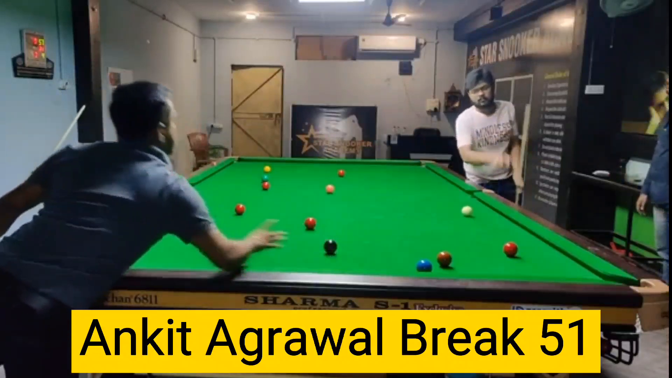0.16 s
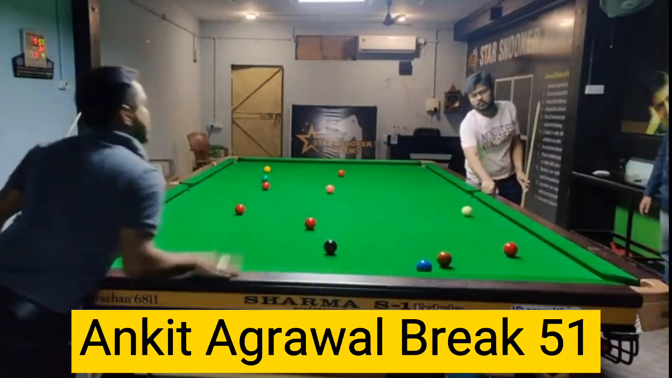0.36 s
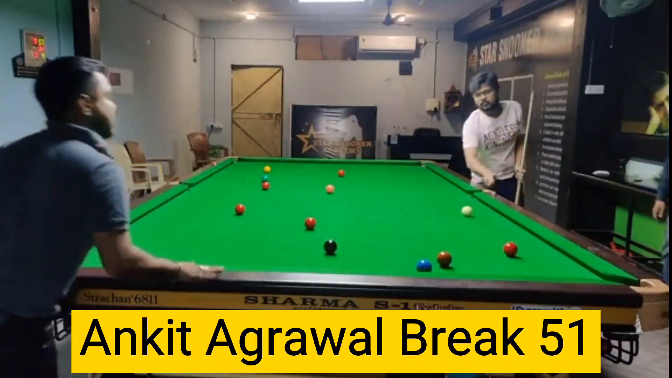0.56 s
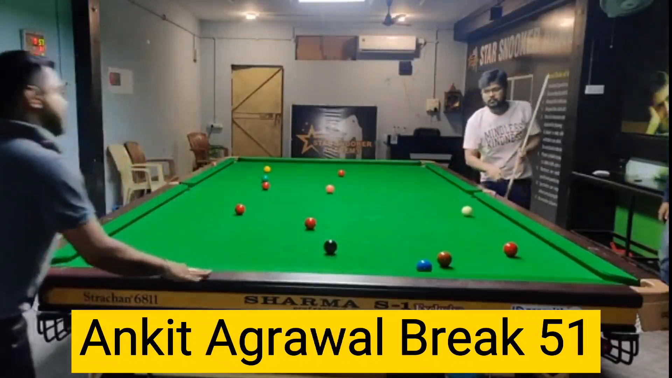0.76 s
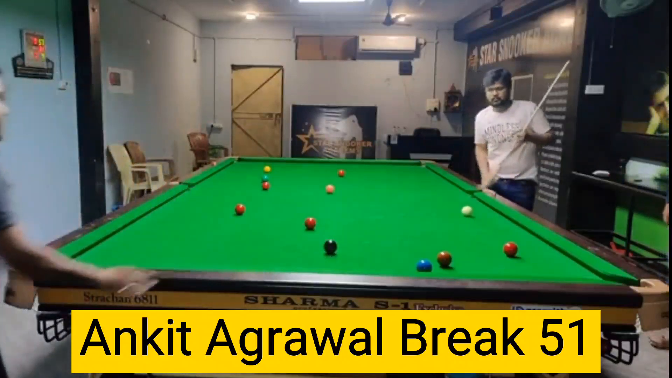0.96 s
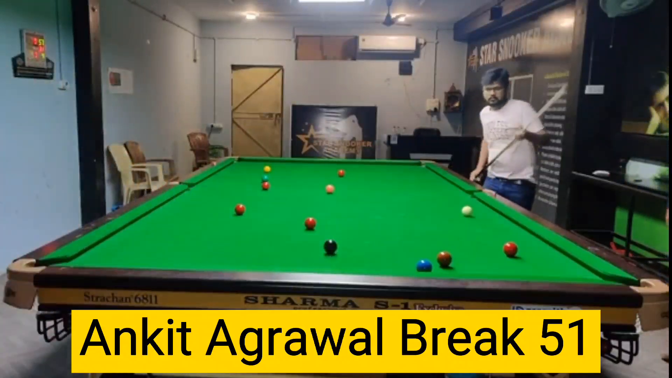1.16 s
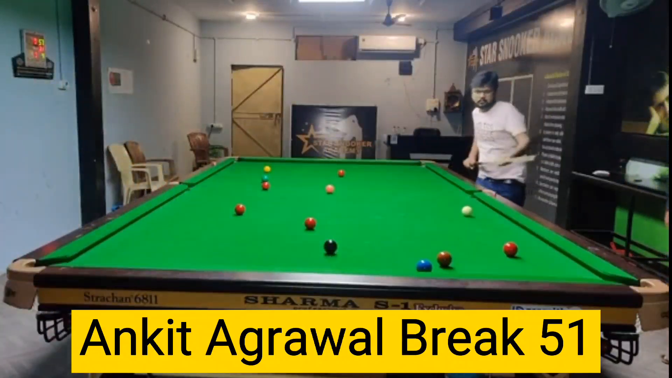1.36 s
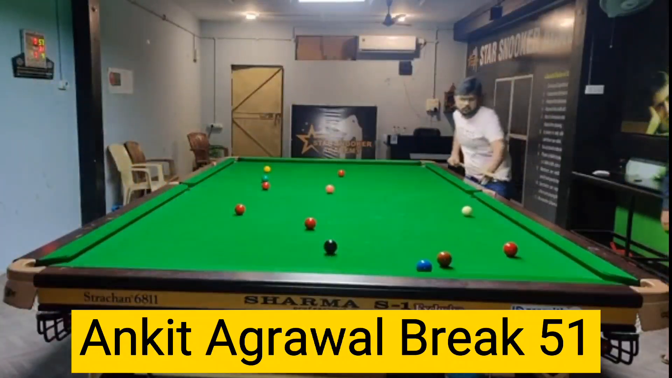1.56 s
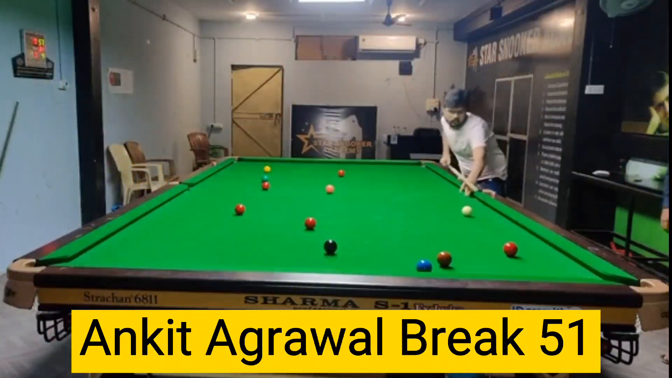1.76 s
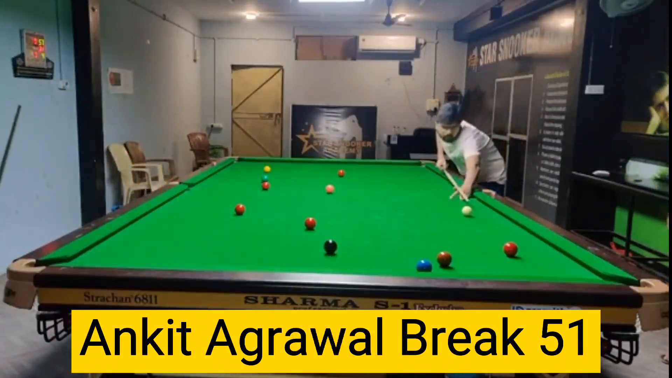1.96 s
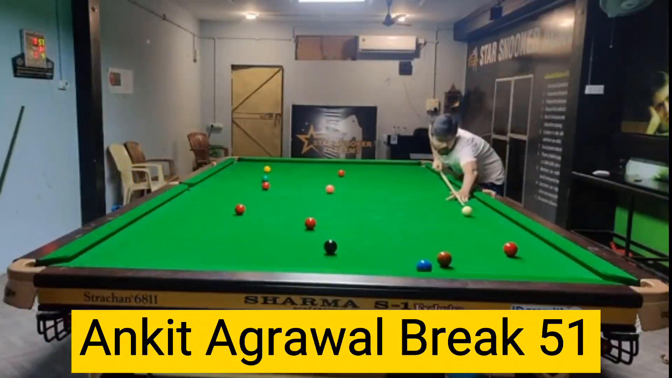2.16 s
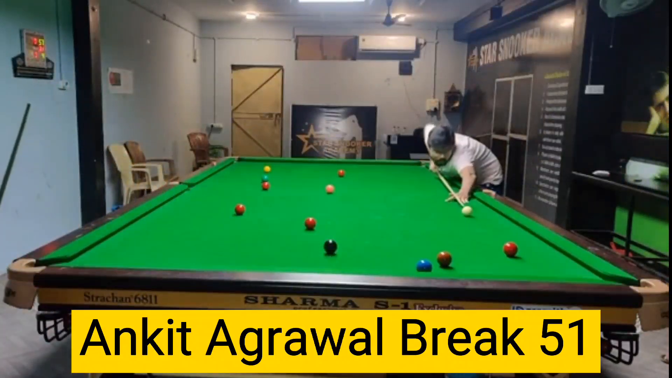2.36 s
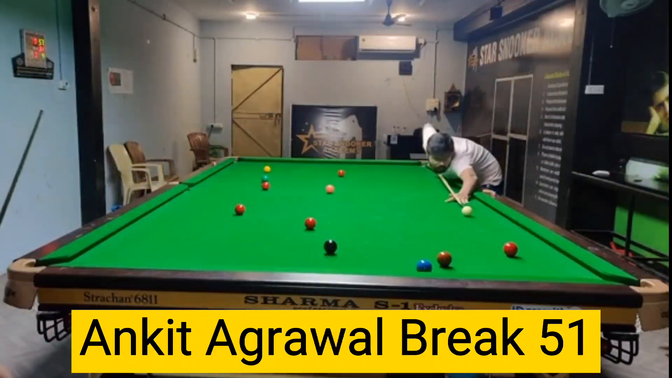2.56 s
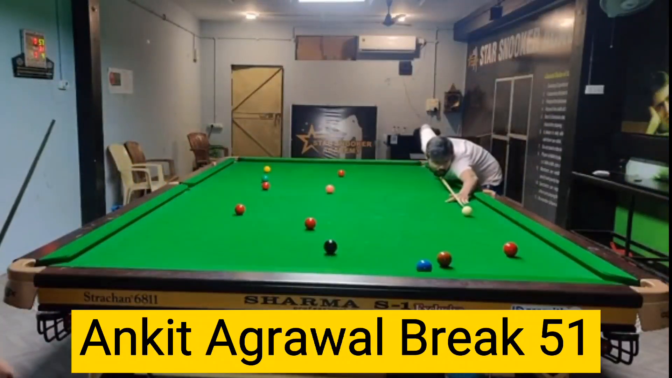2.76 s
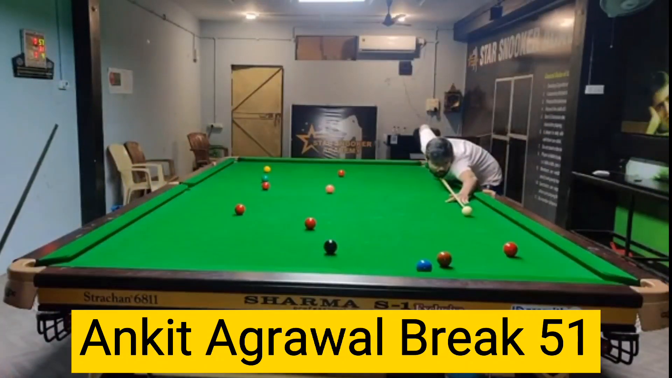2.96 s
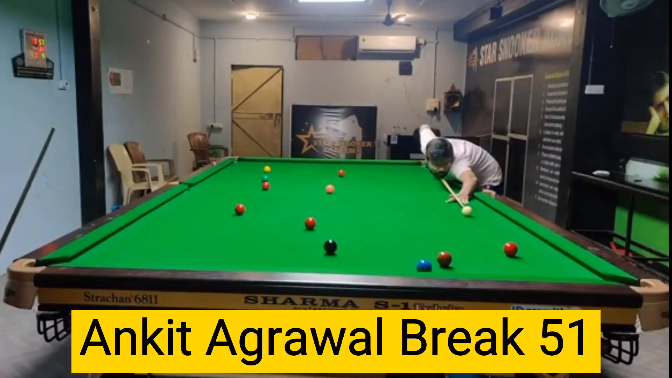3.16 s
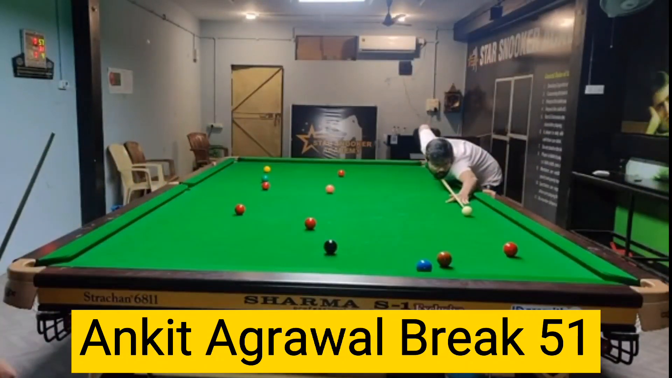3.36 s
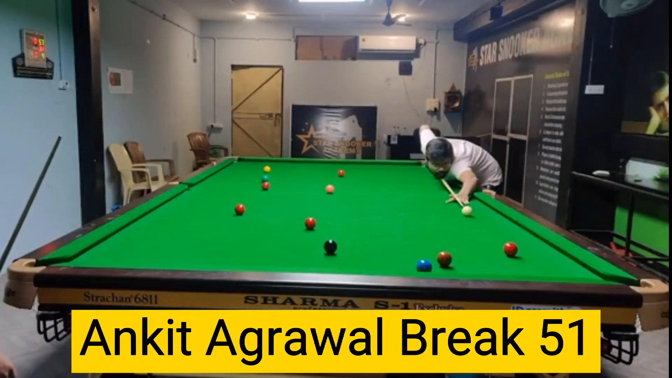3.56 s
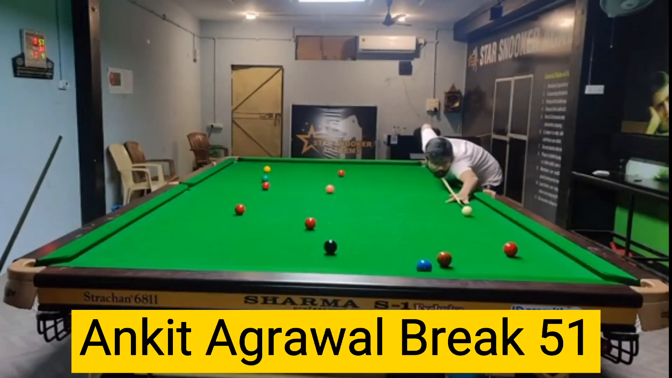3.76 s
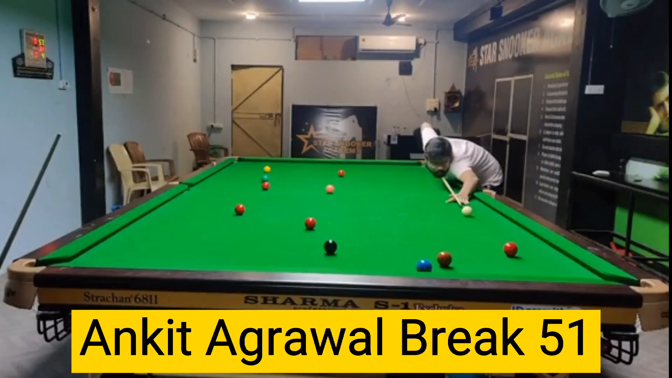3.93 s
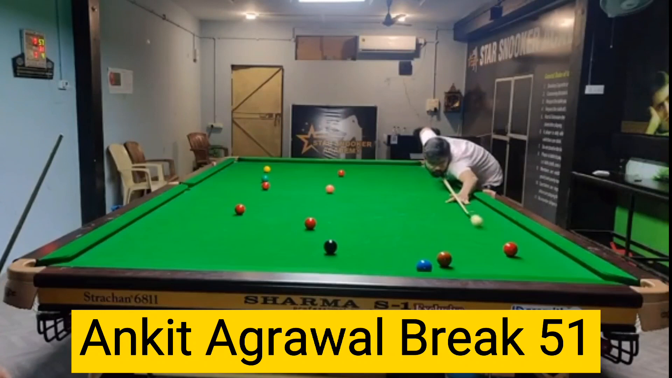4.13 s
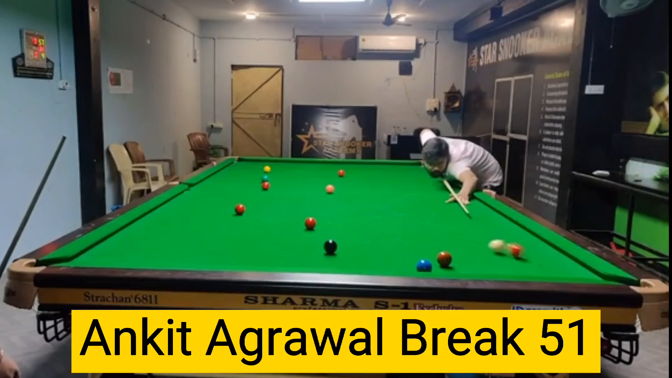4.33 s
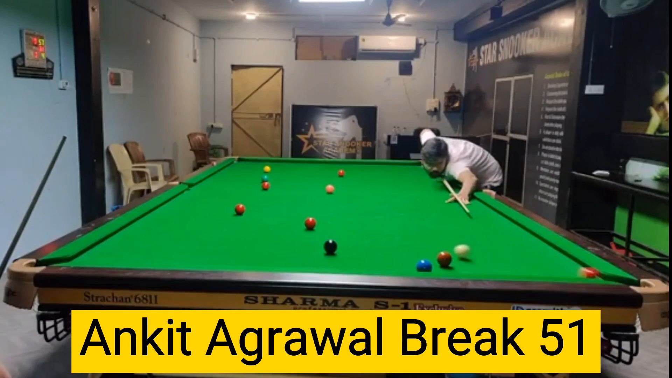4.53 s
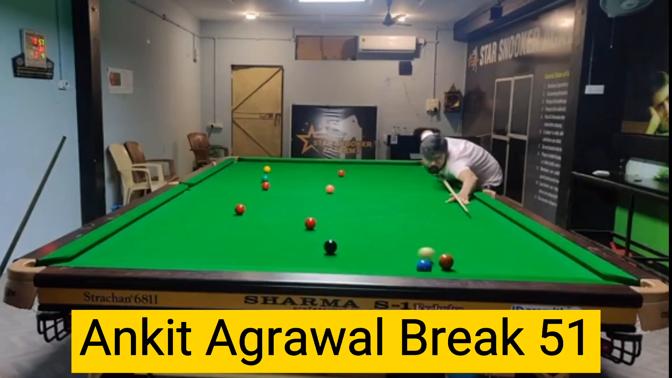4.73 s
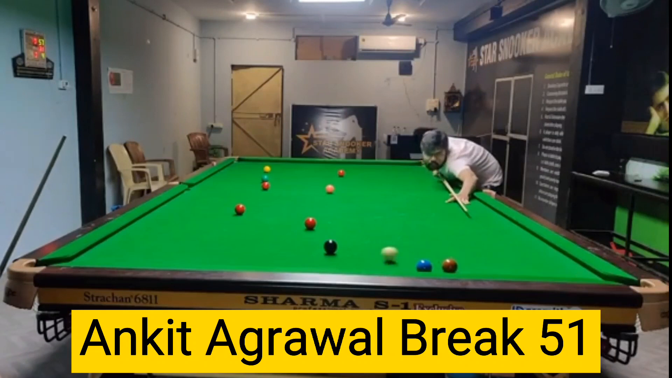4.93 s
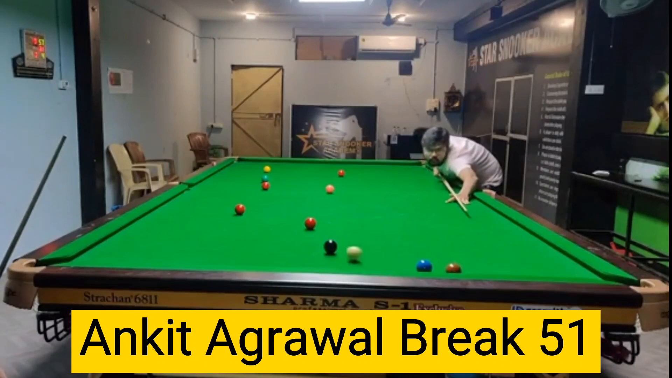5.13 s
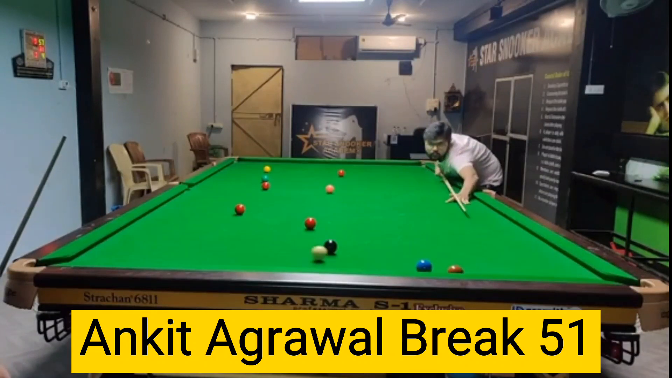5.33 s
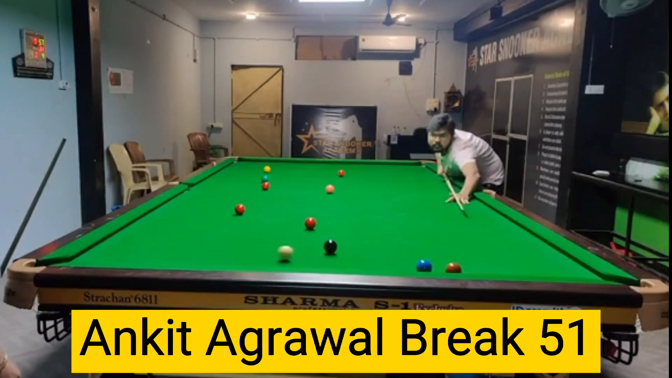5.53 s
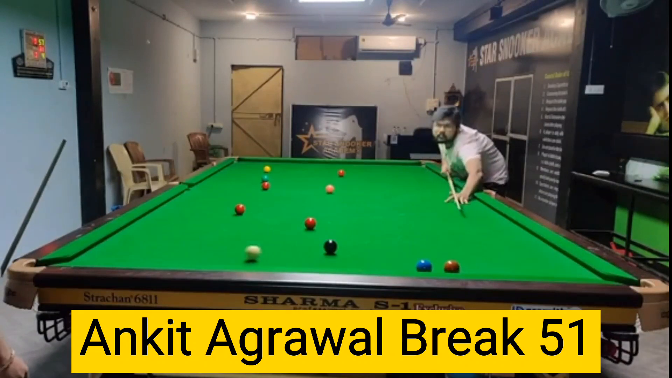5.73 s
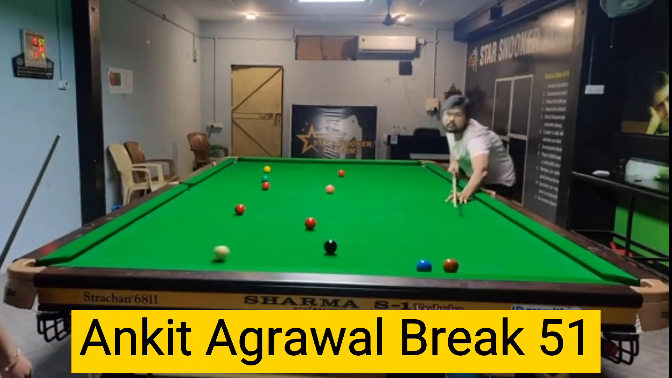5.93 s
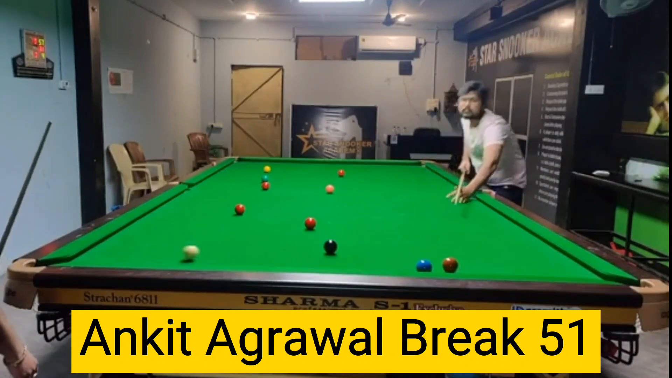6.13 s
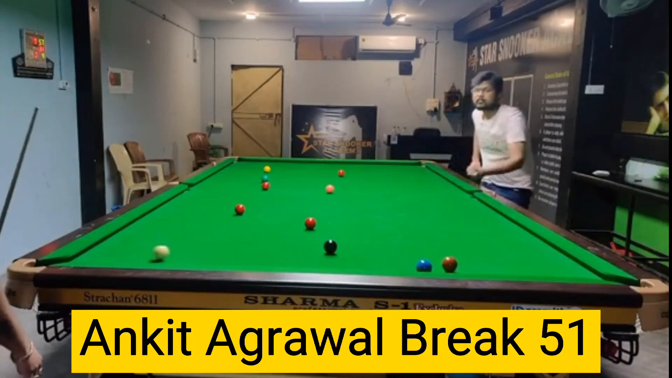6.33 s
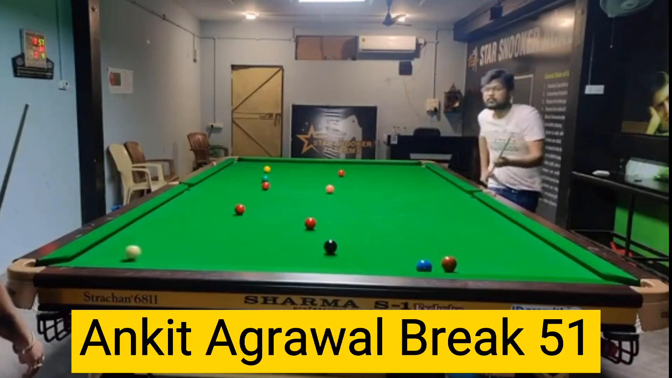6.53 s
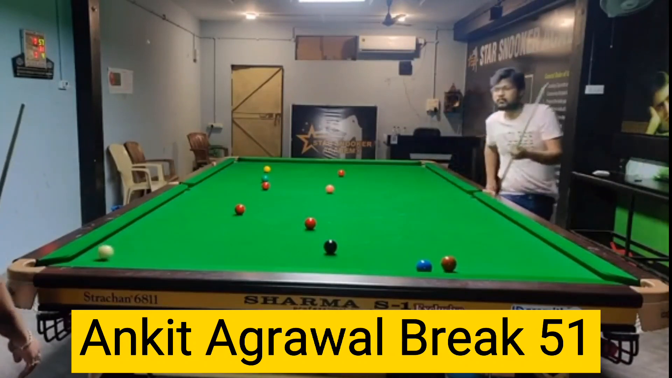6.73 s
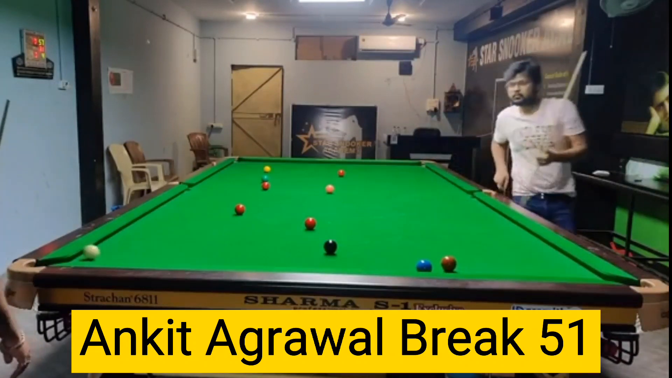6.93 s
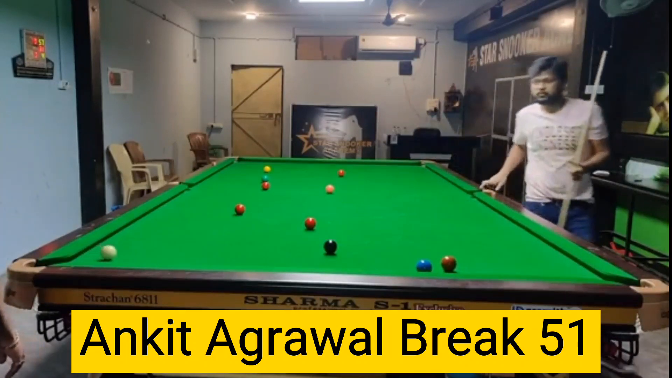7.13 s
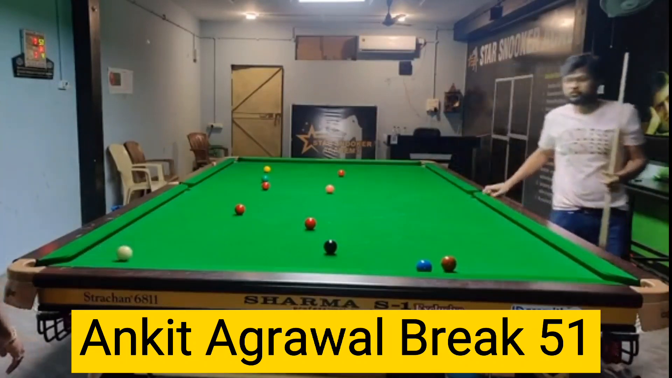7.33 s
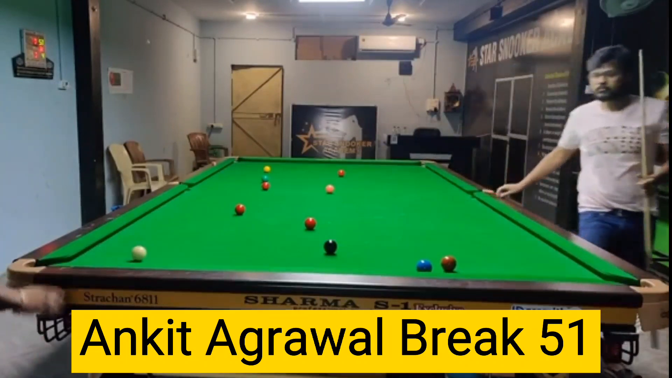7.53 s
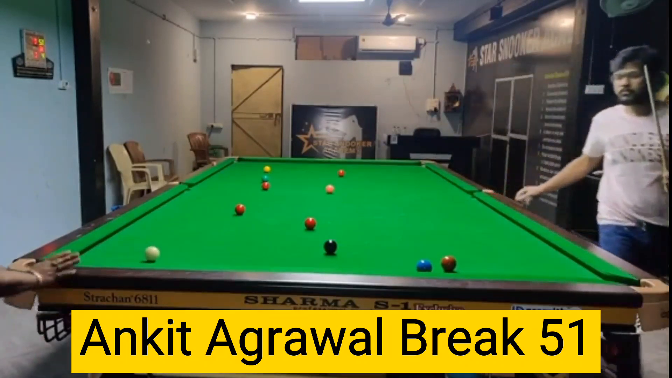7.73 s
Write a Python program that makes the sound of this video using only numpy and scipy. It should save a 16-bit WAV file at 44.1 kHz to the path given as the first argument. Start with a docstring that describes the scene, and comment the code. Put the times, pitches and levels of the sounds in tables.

```python
"""A snooker hall with bare walls: soft sounds lead into a clatter of wooden gear, bumps of the rail and taps.
Then a cue strikes, balls click, one thuds into a pocket, a cushion is touched, knocks and scuffs follow.
Each blow is a short sine pulse; noise in decaying bands rings after it for about a second or more.
A low noise rumble, likely rolling balls, follows the big blows; filtered noise makes the steady fans.
A dull microphone filters it all, and a hiss rises and falls with the sound."""
import sys
import numpy as np
from scipy import signal
from scipy.fft import rfft, irfft, next_fast_len
from scipy.io import wavfile
from scipy.ndimage import uniform_filter1d, map_coordinates

SR = 44100
rng = np.random.default_rng(int(sys.argv[2]) if len(sys.argv) > 2 else 0)


def field_ratio(decibels):
    """Amplitude ratio for a level in dB (20 dB per decade); scalars and array-likes work."""
    return 10 ** (np.asarray(decibels, dtype=float) / 20)


def int16_out(signal):
    """Quantize to a 16-bit WAV file."""
    q = np.round(np.clip(np.atleast_2d(signal).T, -1, 1) * 32767)
    wavfile.write(sys.argv[1], SR, q.astype(np.int16))


N = 343532


def shot():
    """Impact excitation: cue tip, ball on ball, the damped drop into the pocket and later knocks."""
    # blows: [t/s, contact level/dB, hall level/dB, contact f/Hz, blow length/s]
    cue_blows = [(4.2380, -3, -17, 740, .01)]
    ball_blows = [(4.515, -.5, -14, 2300, 0.005), (4.8455, -6.5, -29.5, 1900, 0.0019)]
    pocket_blows = [(5.013, -25.5, -30, 724, 0.0033), (5.031, -18.5, -33.5, 339, 0.023),
                    (5.064, -20, -44, 332, 0.0091), (5.108, -24.5, -40.5, 360, 0.025),
                    (5.193, -32, -48, 353, 0.013)]
    knock_blows = [(5.5885, -23.5, -30, 2900, 0.0025), (5.6065, -25, -35, 1900, 0.0026)]
    # relative spectra of the ringing: [f/Hz, density/dB per Hz]
    cue_tone = [(50, -68.5), (130, -17), (450, -9.5), (800, -7.5), (1200, -12.5), (2000, -20.5),
                (3000, -25), (4200, -34), (5700, -58), (9000, -110)]
    ball_tone = [(47, -43), (80, -24.5), (188, -16.5), (333, -21.5), (394, -14.5), (708, -11.5),
                 (1230, -3.5), (2140, 4), (3320, -7.5), (4410, -39.5), (5730, -64.5), (9700, -120)]
    pocket_tone = [(60, -47), (110, -15.5), (250, -5.5), (360, 0), (450, -8), (750, -11.5), (1000, -20.5),
                   (1400, -40), (2200, -84)]
    knock_tone = [(59, -18.5), (100, -6), (195, 0.5), (243, -9.5), (391, -3.5), (638, -10.5), (948, -10),
                  (1240, -3.5), (1340, -8.5), (1600, -5), (2920, -8), (4410, -41.5), (5730, -70),
                  (9700, -120)]
    # resonances of the cue shaft: [f/Hz, width/Hz, level/dB]
    cue_ring = [(1324, 40, -5), (1810, 95, -4), (2160, 116, 2), (2550, 130, -5.5), (3130, 390, -18.5),
                (3430, 250, -14.5), (3913, 90, -13.5)]
    # the cue's ring lasts longer near 300 and 1500 Hz, shorter near 800 Hz: [f/Hz, factor on t60]
    cue_stretch = [(300, 1.26), (800, 0.73), (1500, 1.43), (4000, 0.91)]
    # the pocket damps the thud: [f/Hz, factor on t60]
    net = [(200, 0.84), (400, 1), (800, 0.75)]
    cue = blows(cue_blows, ringing(cue_ring, cue_tone), cycles=.7, echo_db=2.5, stretch=cue_stretch)
    balls = blows(ball_blows, ball_tone, cycles=1.4, echo_db=4.5)
    pocket = blows(pocket_blows, pocket_tone, cycles=2.5, echo_db=0.0, stretch=net)
    knocks = blows(knock_blows, knock_tone, cycles=3.5, echo_db=1.0)
    return cue + balls + pocket + knocks


def woodwork():
    """Modal resonance of struck wood: gear clatters, bumps the rail and taps."""
    # blows: [t/s, contact level/dB, hall level/dB, contact f/Hz, blow length/s]
    clatter_blows = [(.5705, -10, -19, 1790, 0.0018)]
    rail_blows = [(.7195, -3.5, -18, 1110, 0.00096), (.853, -7.5, -29.5, 1180, 0.0044),
                  (.945, -14, -35, 1170, 0.02)]
    tap_blows = [(1.579, -20.5, -29.5, 550, 0.0073), (1.645, -20.5, -33.5, 870, 0.003),
                 (1.699, -22.5, -41, 895, 0.013)]
    # relative smooth spectra of the ringing: [f/Hz, density/dB per Hz]
    clatter_tone = [(50, -45), (100, -16), (200, -2), (1000, -12), (2200, -11.5), (3100, -19), (4400, -35),
                    (5700, -86), (9000, -110)]
    rail_tone = [(50, -58), (100, -22), (250, -4), (750, -7.5), (1100, -13), (2000, -10.5), (2850, -30.5),
                 (3200, -22.5), (4400, -48.5), (5700, -64), (9000, -110)]
    tap_tone = [(50, -32), (100, -7.5), (250, 1.5), (720, -1.5), (1100, -8.5), (2300, -15), (3600, -25),
                (4400, -39), (5700, -76), (9000, -110)]
    # resonances of the clattering stick, the rail and the tapped wood: [f/Hz, width/Hz, level/dB]
    clatter_ring = [(255, 195, -6.5), (613, 40, 3.5), (1298, 86, -0.5), (1800, 93, 0.5), (2000, 260, -2),
                    (2320, 25, -1.5), (3240, 180, -17)]
    rail_ring = [(251, 140, -1.5), (754, 160, -4.5), (1288, 51, -6.5), (1474, 87, -3), (1760, 56, -5.5)]
    tap_ring = [(1418, 49, 4), (1730, 82, -1.5), (2630, 140, -9), (3900, 100, -21.5)]
    clatter = blows(clatter_blows, ringing(clatter_ring, clatter_tone), cycles=1.8, echo_db=0.5)
    rail = blows(rail_blows, ringing(rail_ring, rail_tone), cycles=0.68, echo_db=-4.0)
    taps = blows(tap_blows, ringing(tap_ring, tap_tone), cycles=0.75, echo_db=1.0)
    return clatter + rail + taps


def soft_sounds():
    """Weak broadband excitation: the clatter's lead-in, a cushion touch and scuffs, likely shoes."""
    # soft sounds, mostly heard through the hall:
    # [t/s, contact level/dB, hall level/dB, contact f/Hz, length/s]
    soft_blows = [(.515, -65, -38.5, 2070, 0.087), (.563, -59, -30.5, 2000, .008),
                  (1.405, -37, -52.5, 2000, 0.009), (1.96, -57, -50.5, 1990, 0.032),
                  (5.305, -45, -44.5, 3520, 0.0014), (6.37, -61, -51, 2000, 0.036),
                  (6.565, -55, -50.5, 2200, 0.016), (6.79, -70, -43.5, 2500, 0.043),
                  (6.842, -48, -44, 1810, 0.014), (6.91, -49, -51.5, 2000, 0.043)]
    # relative spectrum of the ringing: [f/Hz, density/dB per Hz]
    soft_tone = [(150, -52.5), (300, -1.5), (720, -5.5), (1370, -6), (1730, -1.5), (2200, -8.5),
                 (2950, -10), (3500, -13), (4400, -28), (5700, -49), (9000, -110)]
    return blows(soft_blows, soft_tone, cycles=1.2, echo_db=4.5)


def blows(events, tone, cycles, echo_db, stretch=None):
    """Superposition of direct sound, a short contact pulse for each blow, and reverberant sound."""
    # the contact has little deep bass and a dull top: [f/Hz, gain/dB]
    contact_cut = [(50, -33.5), (250, -1), (500, 1), (3600, -0.5), (4600, -20), (6000, -30.5)]
    if stretch is None:
        # ordinary decay: [f/Hz, factor on t60]
        stretch = [(1000, 0.95)]
    direct, reverberant = np.zeros(N + SR), np.zeros(N + 2 * SR)
    t = np.arange(SR // 10) / SR
    for s, contact_db, hall_db, hz, blow_s in events:
        pulse_s = cycles / hz  # width of the bell between its 1/e points
        bell = np.exp(-(2 * t / pulse_s - 2) ** 2)
        pulse = np.sin(2 * np.pi * hz * t) * bell
        start = round(s * SR)
        direct[start:][:len(t)] += field_ratio(contact_db) * pulse
        reverberant[start:][:2 * SR] += field_ratio(hall_db) * hall(tone, blow_s, echo_db, stretch)
    return reverberant[:N] + shaped(direct[:N], contact_cut)


def hall(tone, blow_s, echo_db, stretch):
    """Reverberation: distinct early echoes melt into a diffuse tail, exponential in each band."""
    # decay of the hall before stretching: [f/Hz, t60/s]
    hall_t60 = [(100, 1.5), (300, 1.49), (1000, 1.554), (2000, 1.144), (4000, 1.025)]
    t = np.arange(2 * SR) / SR
    knots = rng.standard_normal(size=1200)
    roughness = map_coordinates(knots, [t * 420])  # 420 random points a second
    echoes = field_ratio(echo_db * np.exp(-t / 0.092) * roughness)
    noise = coloured(rng.standard_normal(len(t)), tone)
    even_echoes = echoes / np.sqrt(uniform_filter1d(echoes ** 2, size=2200))
    hz, frame_s, z = signal.stft(noise * even_echoes, SR, nperseg=256)
    t60 = along(hall_t60, hz) * along(stretch, hz)
    decay = field_ratio(-60 * frame_s / t60[:, None])
    tail = signal.istft(z * decay, SR, nperseg=256)[1][:len(t)]
    return tail * (1 - np.exp(-t / max(blow_s, .001)))  # the hall fills while the blow lasts


def swell_db():
    """Gain envelope: after loud blows the ring holds up or swells, then drops a step."""
    # [t/s, length/s, first level/dB, last level/dB]
    swells = [(0.846, 0.13, 4, 5), (1.585, 0.11, 5, 4.5), (4.228, 0.28, -0.5, 3), (4.513, 0.18, -1, 3.5),
              (5.03, .2, 3, 3.5), (5.581, 0.097, 6, 0.5), (6.84, 0.1, 3, 0.5)]
    step_s = 0.019
    t, gain_db = np.arange(N) / SR, np.zeros(N)
    for s, length, first_db, last_db in swells:
        after = t >= s  # a later swell replaces what is left of an earlier one
        gain_db[after] = np.interp(t[after] - s, [0, length, length + step_s], [first_db, last_db, 0])
    return uniform_filter1d(gain_db, size=SR // 300)  # no jump is quite sudden


def rolling():
    """Rolling friction noise: a rumble, likely balls on the cloth, sets in after big blows and fades."""
    # onsets: [t/s, level/dB before rise and fade]
    onsets = [(.58, -37), (1.6, -53.5), (4.25, -33), (6.85, -47)]
    # relative spectrum of the rumble: [f/Hz, density/dB per Hz]
    roll_tone = [(25, -18.5), (69, -18.5), (92, -8.5), (191, -5), (301, -12), (657, -19.5), (1200, -23),
                 (4410, -48.5), (5730, -75.5), (9700, -120)]
    rise_s, fade_db_per_s = .1, 8
    t = np.arange(N) / SR
    size = np.zeros(N)
    for s, db in onsets:
        since = np.maximum(t - s, 0)
        size += field_ratio(db - fade_db_per_s * since) * (1 - np.exp(-since / rise_s))
    return size * coloured(rng.standard_normal(N), roll_tone)


def fans():
    """Stationary flow noise with a faint resonant whine, slightly unsteady in level."""
    # relative spectrum of the air noise: [f/Hz, density/dB per Hz]
    fan_tone = [(15, -57.5), (25, -20.5), (69, -16), (92, -6), (191, -4), (301, -13), (399, -12),
                (426, -17), (657, -16), (870, -19), (969, -21.5), (1150, -24), (1260, -24.5), (4410, -46.5),
                (5730, -87.5), (9700, -120)]
    # the whine: [f/Hz, width/Hz, level/dB]
    fan_ring = [(965, 21, -20.5)]
    # course of the fan level: [t/s, level/dB]
    fan_level = [(0, -47.5), (2.3, -52.5), (3.3, -51), (4.2, -47), (7.79, -48.5)]
    drift = map_coordinates(rng.standard_normal(size=200), [np.arange(N) * 9 / SR])
    air = coloured(rng.standard_normal(N), ringing(fan_ring, fan_tone))
    return field_ratio(along_time(fan_level) + 0.26 * drift) * air


def microphone(sound):
    """Linear frequency response: the treble falls steeply above a small peak."""
    # [f/Hz, gain/dB]
    response = [(20, -12.5), (70, -1), (4300, 0.5), (5000, 6.5), (6500, -39.5), (9000, -74.5)]
    return shaped(sound, response)


def hiss(sound):
    """Level-dependent noise: the hiss rises 0.42 dB for each dB of the sound."""
    # relative spectrum of the hiss: [f/Hz, density/dB per Hz]
    hiss_tone = [(4400, -39), (5200, -9), (6000, -7.5), (7900, -2), (8200, -13), (10800, -12.5),
                 (11800, -21.5), (12700, -21.5), (12900, -14), (15300, -14), (15500, -68)]
    size = field_ratio(-59.5 + 0.42 * level_db(sound, 0.023))
    return size * coloured(rng.standard_normal(N), hiss_tone)


def ringing(peaks, slope_db):
    """Modal superposition: the power of sharp resonances adds to that of a smooth slope."""
    hz = np.geomspace(15, 9000, num=900)
    power = field_ratio(2 * along(slope_db, hz))
    for centre, width, db in peaks:
        power = power + field_ratio(2 * db) / (1 + (2 * (hz - centre) / width) ** 2) ** 2
    return np.transpose([hz, 10 * np.log10(power)])


def shaped(x, spectrum):
    """Linear filtering: each frequency of x is weighted by (f/Hz, gain/dB) points."""
    m = next_fast_len(len(x) + 8192)
    gain = field_ratio(along(spectrum, np.fft.rfftfreq(m, 1 / SR)))
    return irfft(rfft(x, m) * gain, m)[:len(x)]


def coloured(x, spectrum):
    """Spectral shaping of noise, brought to rms 1."""
    return unit(shaped(x, spectrum))


def unit(x):
    """Normalisation by mean power, to rms 1."""
    return x / np.sqrt(np.mean(x ** 2) + 1e-20)


def level_db(x, seconds):
    """Short-time mean power: running rms level in dB over the moment just past."""
    size = int(seconds * SR) // 2 * 2 + 1
    power = np.abs(uniform_filter1d(x ** 2, size, origin=size // 2))
    return 10 * np.log10(power + 1e-12)


def along(points, hz):
    """Interpolation of (f/Hz, value) points on a logarithmic frequency axis."""
    f, v = np.transpose(points)
    return np.interp(np.log(hz + 1), np.log(f + 1), v)


def along_time(rows):
    """Linear interpolation of (t/s, value) points, one value per sample."""
    return np.interp(np.arange(N) / SR, *np.transpose(rows))


def scene():
    """Superposition of all sources in one channel."""
    hits = shot() + woodwork() + soft_sounds()
    return (hits * field_ratio(swell_db()) + rolling() + fans())[None]


def top_cut(x):
    """Nothing passes above the cut-off."""
    return signal.sosfilt(signal.butter(12, 15500, fs=SR, output="sos"), x)


def record(dry):
    """Transduction by a dull microphone, with a hiss that follows the level of the sound."""
    sound = microphone(dry[0])
    mix = (sound + hiss(sound))[None]
    return top_cut(mix)


dry = scene()
out = record(dry)
int16_out(out)
```